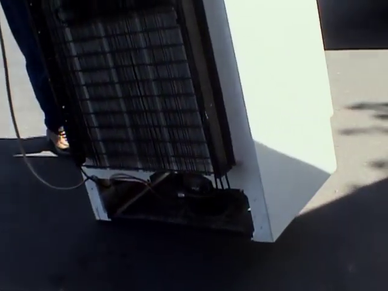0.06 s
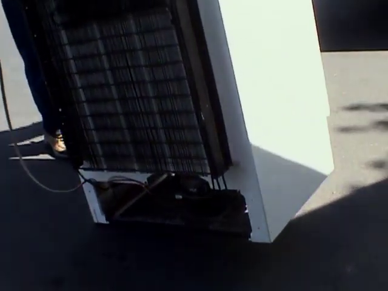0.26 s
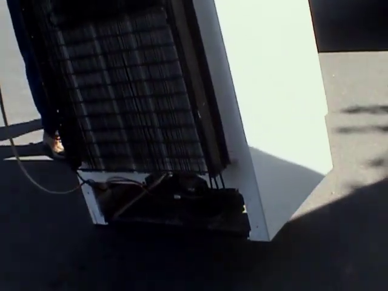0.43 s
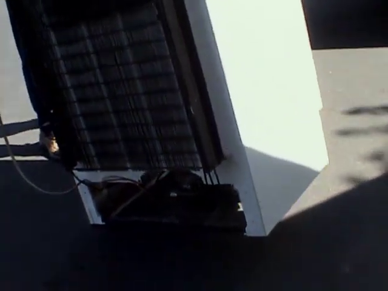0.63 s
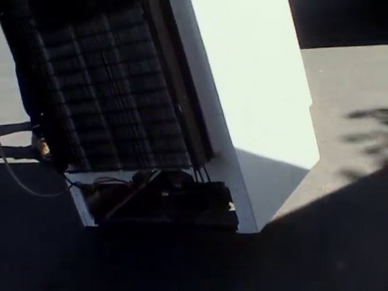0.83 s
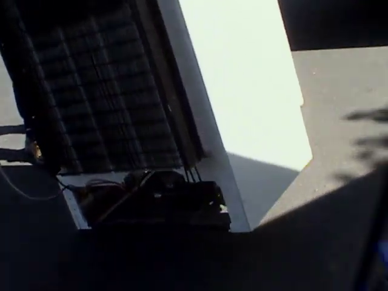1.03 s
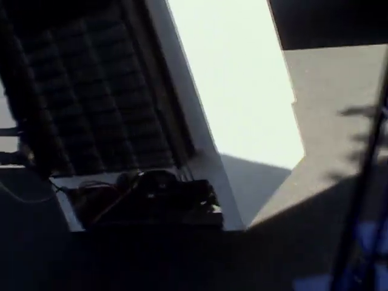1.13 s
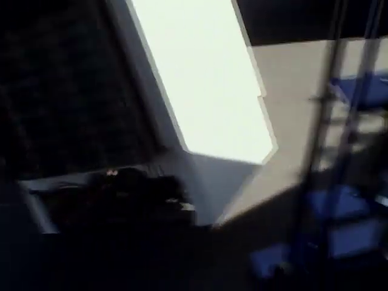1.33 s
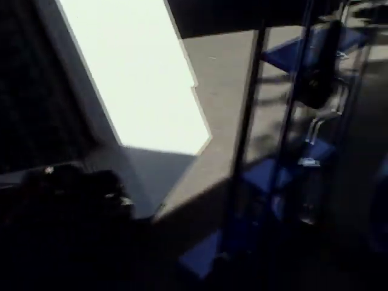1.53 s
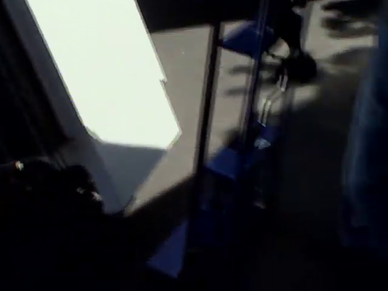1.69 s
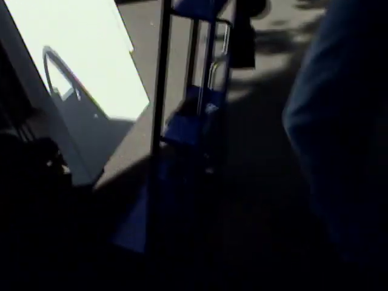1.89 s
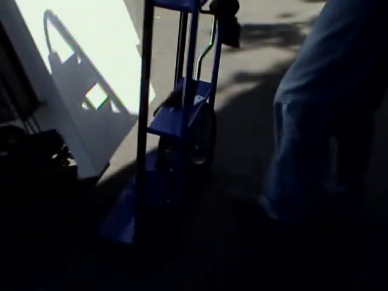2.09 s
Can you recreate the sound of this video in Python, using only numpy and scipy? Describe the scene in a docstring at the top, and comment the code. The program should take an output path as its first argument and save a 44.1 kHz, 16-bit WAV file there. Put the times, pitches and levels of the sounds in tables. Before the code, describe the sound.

Dense metallic rattling of a hand truck on an open paved street breaks out suddenly, drops to a clink and light knocks, swells again, then dwindles; dry close stereo microphone with wind rumble and faint hiss.

```python
"""Outdoors on a paved street, a steel hand truck is jolted and rolled, a little to the right of the microphone.
Random contacts on its toe plate, tubes and loose hardware set off dying modes: dense rattle and knocks.
One small part clinks brightly, and lone frame modes ring clear. No echo surrounds the steel.
Wind buffets the two microphone ports as swelling low noise.
Behind lies a quiet street floor of steady noise with a narrow hiss."""
import sys
import numpy as np
from scipy import signal
from scipy.fft import rfft, irfft
from scipy.io import wavfile
from scipy.ndimage import uniform_filter1d

SR = 44100
rng = np.random.default_rng(int(sys.argv[2]) if len(sys.argv) > 2 else 0)


def wrap_up_sound(samples):
    """Save the sound to the file named by the first command line argument, as 16-bit audio."""
    columns = np.atleast_2d(samples).T
    # keep every value between -1 and 1, then stretch to whole-number steps
    tamed = np.clip(columns, -1, 1)
    steps = np.round(tamed * 32767).astype(np.int16)
    wavfile.write(sys.argv[1], SR, steps)


def voltage_ratio(level):
    """Linear amplitude factor for a level in decibels (scalar or array-like)."""
    return 10 ** (np.asarray(level, float) / 20)


N = 94815

# Levels of the steel tables stand before the placing, which lifts the whole truck.
# Shaking of the truck. Each row: time in seconds, drive of plate, of tubes and of hardware in dB.
SHAKING = [(.25, -16, -14, -17), (.3, -14.5, -14.5, -16.5), (.44, -16, -12.5, -18), (.52, -19.5, -20, -27),
           (.6, -31, -33.5, -50.5), (.71, -33, -42.5, -87), (.735, -31, -32, -38), (.89, -42, -53, -51.5),
           (.97, -38, -41, -53), (1.1, -30, -41, -45), (1.135, -23.5, -23, -28), (1.2, -17, -13.5, -15.5),
           (1.27, -16, -15.5, -22), (1.34, -21, -15, -19), (1.42, -23.5, -29, -36), (1.62, -46.5, -53, -63),
           (1.665, -30, -23.5, -28.5), (1.72, -24, -34.5, -44), (1.8, -28.5, -27.5, -35),
           (1.885, -29.5, -31.5, -44), (1.95, -41, -44, -56.5), (2.02, -45, -49.5, -55),
           (2.15, -40.5, -45, -51)]
# Single knocks. Each row: start in seconds, drive of plate and of tubes in dB.
KNOCK_EVENTS = [(0.244, -8, -18.5), (0.2518, -32, -9.5), (0.6261, -32, -25), (0.6635, -23.5, -24),
                (0.9151, -28.5, -17), (1.0044, -34, -26.5), (1.112, -53, -22), (1.1263, -34, -18),
                (1.153, -23, -21), (1.284, -18, -25), (1.335, -37, -18.5), (1.543, -50, -28.5),
                (1.635, -18, -33), (1.674, -18.5, -33), (1.74, -36, -31), (1.777, -32, -24.5),
                (1.826, -24.5, -32), (1.862, -33, -26), (2.0307, -41, -33), (2.096, -33.5, -45.5)]
# Band edges of plate, tubes and hardware, low to high. Each entry: frequency in Hz.
PART_BAND_EDGES_HZ = [180, 1600, 6000, 15000]
# Typical ring time of the weak modes of plate, tubes and hardware. Each entry: 60 dB decay in seconds.
PART_DECAY_S = [0.1, 0.1, 0.058]
# Strength of the many weak steel modes. Each row: frequency in Hz, relative level in dB.
WEAK_MODES = [(180, -18), (380, -8), (550, -10), (800, -5.5), (1350, -4.5), (1750, -9), (2590, -3),
              (2840, 1.5), (4880, -2.5), (8540, -5), (11900, -24), (15500, -60)]
# Narrow tones that stand out of the rattle. Each row: frequency in Hz, level over the weak modes in dB.
STANDOUT_TONES = [(405, 1.5), (735, 6), (940, 6), (1130, 4), (1280, 8), (1365, 6), (2458, 4), (2741, 3.5),
                  (3255, 1), (3950, 1), (4120, 2), (4230, 2), (5272, 3), (6106, 4), (10300, 8)]
# Modes of the small clinking part. Each row: frequency in Hz, relative level in dB, 60 dB decay in seconds.
CLINK_MODES = [(904, -14, .25), (1287, -4, .2), (1330, -7, .2), (2075, -10, .25), (2140, -10, .3),
               (2476, -10, .2), (2966, -16, .2), (5960, -11, 0.14), (7520, -8, 0.13), (8150, -5, .09),
               (8900, 0, 0.086), (9600, 1, 0.1)]
# Colour of the clink's noisy tail. Each row: frequency in Hz, relative density in dB per Hz.
CLINK_TAIL_COLOUR = [(300, -24), (1300, -7), (2100, -8), (5050, -20), (8280, 1.5), (15500, -34.5)]
# Lone frame modes. Each row: start in seconds, frequency in Hz, level in dB, 60 dB decay in seconds.
LONE_RINGS = [(.2455, 762, -15, 0.22), (0.25, 920, -4.5, 0.029), (.68, 1260, -28.5, 0.25),
              (0.85, 3216, -43, 3.6), (1.19, 4940, -12, 0.19), (1.128, 6100, -15, 0.12),
              (1.545, 3800, -37, 0.21), (1.45, 1360, -30.5, .4), (1.686, 560, -16, 0.044),
              (1.863, 5290, -31.5, 0.33), (1.37, 5270, -25, .55), (1.554, 1322, -26.5, 0.3),
              (1.525, 2750, -39, 0.6), (1.795, 2000, -29, 0.35), (1.83, 1350, -18.5, 0.075),
              (1.88, 1337, -23, 0.16), (2.031, 2670, -39.5, 0.32), (2.1, 1160, -29, 0.062)]
# Full sideways tilt of the truck. Each row: frequency in Hz, left minus right in dB.
SIDE_TILT = [(200, 0), (380, 0.5), (700, -1.5), (1290, -3.5), (2380, -4.5), (4400, -7), (8120, -1),
             (15000, -4)]
# The truck moves toward the middle. Each row: time in seconds, share of the tilted sound (1 = full tilt).
TILT_SHARE = [(0, 1.37), (1.4, 1), (1.7, 0.48), (2.15, 0.47)]
# How alike the steel is at the two ports. Each row: frequency in Hz, left-right likeness (1 = identical).
PORT_LIKENESS = [(200, 1), (1400, 0.97), (3100, 0.78), (6800, 0.84), (15000, 0.33)]
# Wind gusts. Each row: centre in seconds, half width (to 1/e) in seconds, relative swell in dB.
WIND_GUSTS = [(0.123, 0.026, -35.5), (.53, 0.046, -33), (0.593, 0.032, -24), (.65, 0.021, -30.5),
              (0.802, 0.026, -29), (0.918, 0.027, -27), (0.971, 0.033, -26), (1.05, 0.042, -37.5),
              (1.82, 0.062, -37), (1.886, 0.012, -34), (1.96, 0.026, -29.5), (2.061, 0.013, -34),
              (2.14, 0.033, -34)]
# Colour of the low buffeting. Each row: frequency in Hz, relative density in dB per Hz.
BUFFET_COLOUR = [(20, -31), (60, -5.5), (130, 2.5), (250, -2.5), (500, -23), (1600, -70)]
# Colour of the brighter edge of strong gusts. Each row: frequency in Hz, relative density in dB per Hz.
GUST_EDGE_COLOUR = [(100, -28), (250, 1), (500, -5), (900, -18.5), (2600, -60)]
# Colour of the street floor. Each row: frequency in Hz, relative density in dB per Hz.
STREET_COLOUR = [(120, -62), (200, -14), (430, -15.5), (677, -6), (940, -12), (2020, -26), (11800, -40),
                 (15500, -36)]

SHAKE_START_S = 0.2505
CONTACTS_PER_S, CONTACT_SPREAD_DB = 600, 4  # contacts outside knocks, for each loose piece
TURN_DB, TURNS_PER_S = 6, 5  # how strongly and how often the pieces take turns
CLUMP_DB, CLUMPS_PER_S = 1.2, 60  # quick unevenness shared by the pieces of a part
KNOCK_DECAY_S, RING_RISE_S = 0.0057, 0.00038
HARDWARE_LESS_DB = 10.5  # hardware follows the tubes in a knock, this much weaker
STRONG_T60_S, STRONG_PITCH_SPREAD = 0.15, 0.004  # the pieces differ a little in pitch
CRACK_DECAY_S, CRACK_DB = 0.006, 2.5  # dry noise of each contact, over its ringing
CLINK_START_S, CLINK_DB, CLINK_TAIL_DB, CLINK_TAIL_T60_S = 0.7247, -17, -15, 0.25
FLUTTER_DB, FLUTTERS_PER_S = 2.2, 30  # loose joints damp and free the lone rings
TWIN_DB = -5  # a close weaker neighbour makes each lone ring waver
BODY_LOW_HZ, TRUCK_DB = 222, 4.5
WIND_DB, CALM_DB, WIND_LIKENESS = 5, -52.5, -0.58  # negative likeness: the ports mostly oppose
EDGE_DB, EDGE_FOLLOWS, GUST_MEAN_DB = -42.5, 1.87, -38  # edge gains 1.87 dB per dB of swell
STREET_DB, STREET_LIKENESS = -44.5, 0.59
HISS_HZ, HISS_WIDTH_HZ, HISS_DB = 6200, 550, -61
GAIN_KNEE_DB, GAIN_SHARE = -23, 0.38  # dB of cut per dB above the knee
GAIN_ATTACK_S, GAIN_RELEASE_DB_PER_S = 0.0011, 10
MIC_LOW_HZ, MIC_TOP_HZ, CUTOFF_HZ, PEAK_LIMIT = 30, 13800, 16400, 0.95


def rms_one(x):
    """Scale to rms 1."""
    return x / np.sqrt(np.mean(x ** 2) + 1e-20)


def in_time(rows):
    """Columns of a curve table, sample by sample."""
    s, *columns = np.transpose(rows)
    return np.array([np.interp(np.arange(N) / SR, s, column) for column in columns])


def at_hz(points, hz):
    """Read a table on a log-frequency axis."""
    table_hz, values = np.transpose(points)
    return np.interp(np.log(hz + 1), np.log(table_hz), values)


def drift(rate):
    """Slow random wander of rms 1: noise through two equal one-pole lowpasses at rate Hz."""
    r = np.exp(-2 * np.pi * rate / SR)
    wander = signal.lfilter([1], [1, -2 * r, r * r], rng.standard_normal(N + SR))
    return rms_one(wander[SR:])  # the first second settles the filter


def bandpass(x, order, low, high):
    """Keep the sound between two frequencies in Hz."""
    return signal.sosfilt(signal.butter(order, [low, high], "band", fs=SR, output="sos"), x)


def coloured(spectrum, alike, size):
    """Stereo noise of a given colour and left-right likeness, rms 1."""
    hz = np.arange(size // 2 + 1) * SR / size
    mid, side = rfft(rng.standard_normal((2, size))) * voltage_ratio(at_hz(spectrum, hz))
    alike = alike if np.isscalar(alike) else at_hz(alike, hz)
    alike = np.clip(alike, -0.99, 0.99)
    ports = np.sqrt(1 + alike) * mid + np.sqrt(1 - alike) * side * [[1], [-1]]
    return rms_one(irfft(ports, size))


def rings(hz, db, t60):
    """Stereo answer to one blow: dying sines, each reaching the two ports with its own phase gap."""
    t = np.arange(SR // 2) / SR
    gap = np.arccos(np.clip(at_hz(PORT_LIKENESS, hz), 0, 1)) * rng.normal(0, 1, len(hz))
    start = rng.uniform(0, 2 * np.pi, len(hz))
    fade = voltage_ratio(db[:, None] - 60 * t / t60[:, None])
    turning = 2 * np.pi * hz[:, None] * t
    ports = []
    for side in (1, -1):
        phase = (start + side * gap / 2)[:, None]
        ports.append(np.sum(fade * np.sin(turning + phase), axis=0))
    return (1 - np.exp(-t / RING_RISE_S)) * np.array(ports)


def loose_piece(low, high, t60, count=36):
    """One piece of steel: a crowd of weak modes, the outstanding tones in its band and a short crack; energy 1."""
    strong = np.array([mode for mode in STANDOUT_TONES if low <= mode[0] < high])
    weak_hz = low + (high - low) * (np.arange(count) + rng.random(count)) / count
    strong_hz = strong[:, 0] * rng.normal(1, STRONG_PITCH_SPREAD, len(strong))
    hz = np.r_[weak_hz, strong_hz]
    weak_db = rng.normal(0, 3.0, count)
    strong_db = strong[:, 1] + rng.normal(0, 3.5, len(strong))
    db = at_hz(WEAK_MODES, hz) + np.r_[weak_db, strong_db]
    weak_t60 = t60 * voltage_ratio(rng.normal(0, 3.5, count))
    body = rms_one(rings(hz, db, np.r_[weak_t60, np.full(len(strong), STRONG_T60_S)]))
    size = body.shape[1]
    crack = coloured(WEAK_MODES, PORT_LIKENESS, size) * np.exp(-np.arange(size) / SR / CRACK_DECAY_S)
    crack = rms_one(bandpass(crack, 3, low, high))
    return rms_one(body + voltage_ratio(CRACK_DB) * crack) / np.sqrt(size)


def truck(count=4):
    """Random contacts, driven by shaking and by knocks, strike the loose pieces of each part in turn."""
    t = np.arange(N) / SR
    s, plate_db, tubes_db = np.transpose(KNOCK_EVENTS)
    since = t - s[:, None]
    bursts = (since > 0) * np.exp(-np.abs(since) / KNOCK_DECAY_S)
    knock_db = np.array([plate_db, tubes_db, tubes_db - HARDWARE_LESS_DB])
    drive = voltage_ratio(in_time(SHAKING)) * (t > SHAKE_START_S) + voltage_ratio(knock_db) @ bursts
    denser = 1 + 4 * bursts.sum(axis=0)  # contacts crowd at the start of a knock
    out = np.zeros((2, N))
    for k, t60 in enumerate(PART_DECAY_S):
        low, high = PART_BAND_EDGES_HZ[k:k + 2]
        turns = voltage_ratio(TURN_DB * np.array([drift(TURNS_PER_S) for _ in range(count)]))
        turns = turns / np.sqrt(np.sum(turns ** 2, axis=0))  # constant power over all pieces
        turns = turns * voltage_ratio(CLUMP_DB * drift(CLUMPS_PER_S))
        for turn in turns:
            sizes = voltage_ratio(CONTACT_SPREAD_DB * np.minimum(rng.exponential(1, N), 4)) * rng.choice([-1, 1], N)
            touching = rng.random(N) < CONTACTS_PER_S * denser / SR
            hits = rms_one(sizes * touching / np.sqrt(denser)) * drive[k] * turn
            out += signal.fftconvolve(hits[None], loose_piece(low, high, t60), axes=1)[:, :N]
    return out


def clink():
    """A small part is struck and buzzes: a quick run of touches on its modes, and a noisy tail."""
    hz, db, t60 = np.transpose(CLINK_MODES)
    t = np.arange(SR // 2) / SR
    touching = rng.random(len(t)) < 400 / SR  # 400 touches per second
    touches = touching * rng.normal(0, 0.42, len(t)) * np.exp(-t / 0.022)
    touches[0] = 1  # the first blow
    ring = signal.fftconvolve(touches[None], rings(hz, db, t60), axes=1)[:, :len(t)]
    tail_fade = voltage_ratio(CLINK_TAIL_DB - 60 * t / CLINK_TAIL_T60_S)
    tail = tail_fade * coloured(CLINK_TAIL_COLOUR, PORT_LIKENESS, size=len(t))
    struck = voltage_ratio(CLINK_DB) * ring + tail
    return np.pad(struck, ((0, 0), (int(CLINK_START_S * SR), N)))[:, :N]


def pings():
    """Lone modes of the frame that are struck and ring clear, each fluttering and beating with a close twin."""
    out = np.zeros((2, N + SR))
    for s, hz, db, t60 in LONE_RINGS:
        first, size = int(s * SR), SR // 2
        pair_hz = hz + np.array([0, rng.uniform(12.32, 40.48)])
        pair_db = db + np.array([0, TWIN_DB])
        flutter = voltage_ratio(FLUTTER_DB * drift(FLUTTERS_PER_S)[:size])
        out[:, first:first + size] += flutter * rings(pair_hz, pair_db, np.full(2, t60))
    return out[:, :N]


def placed(x):
    """The truck's place between the ports: a left-right level tilt by band, whose share changes in time."""
    half_tilt_db = at_hz(SIDE_TILT, np.arange(N // 2 + 1) * SR / N) / 2
    tilted = irfft(rfft(x) * voltage_ratio(half_tilt_db * [[1], [-1]]), N)
    return voltage_ratio(TRUCK_DB) * (x + in_time(TILT_SHARE) * (tilted - x))


def wind():
    """Lumpy low buffeting, largely opposed in the two ports, brighter in strong gusts."""
    s, width, db = np.array(WIND_GUSTS).T[:, :, None]
    bells = np.exp(-((np.arange(N) / SR - s) / width) ** 2)
    swell_db = 20 * np.log10(voltage_ratio(CALM_DB) + np.sum(voltage_ratio(db) * bells, axis=0))
    buffet = voltage_ratio(WIND_DB + swell_db) * coloured(BUFFET_COLOUR, WIND_LIKENESS, size=N)
    edge_db = EDGE_DB + EDGE_FOLLOWS * (swell_db - GUST_MEAN_DB)
    return buffet + voltage_ratio(edge_db) * coloured(GUST_EDGE_COLOUR, WIND_LIKENESS, size=N)


def street():
    """Steady outdoor floor of coloured noise, and a narrow band of hiss alike in both ports."""
    low, high = HISS_HZ - HISS_WIDTH_HZ / 2, HISS_HZ + HISS_WIDTH_HZ / 2
    hiss = rms_one(bandpass(rng.standard_normal(N), 2, low, high))
    return voltage_ratio(STREET_DB) * coloured(STREET_COLOUR, STREET_LIKENESS, size=N) + voltage_ratio(HISS_DB) * hiss


def scene():
    """All sources at the two ports; the steel sounds carry no deep bass."""
    no_bass = signal.butter(4, BODY_LOW_HZ, "high", fs=SR, output="sos")
    steel = signal.sosfilt(no_bass, truck() + clink() + pings())
    return placed(steel) + wind() + street()


def gain_control(x):
    """Loud passages pull the gain down at once; it creeps back slowly."""
    power = uniform_filter1d(np.mean(x ** 2, axis=0), size=441, origin=220)  # over the last 10 ms
    level_db = 10 * np.log10(power + 1e-9)
    cut_db = GAIN_SHARE * np.maximum(level_db - GAIN_KNEE_DB, 0)
    release_db = GAIN_RELEASE_DB_PER_S * np.arange(N) / SR
    held_db = np.maximum.accumulate(cut_db + release_db) - release_db  # peak cut, released steadily
    r = np.exp(-1 / (GAIN_ATTACK_S * SR))
    return x * voltage_ratio(-signal.lfilter([1 - r], [1, -r], held_db))


def low_pass(x):
    """Removes everything above the highest recorded frequency."""
    return signal.sosfilt(signal.butter(12, 15700, fs=SR, output="sos"), x)


def record(dry):
    """The microphone trims both ends, gain control follows, peaks are rounded and the top is cut steeply."""
    heard = gain_control(bandpass(dry, 3, MIC_LOW_HZ, MIC_TOP_HZ))
    rounded = PEAK_LIMIT * np.tanh(heard / PEAK_LIMIT)
    finished = signal.sosfilt(signal.cheby2(10, 60, CUTOFF_HZ, fs=SR, output="sos"), rounded)
    return low_pass(finished)


dry = scene()
out = record(dry)
wrap_up_sound(out)
```